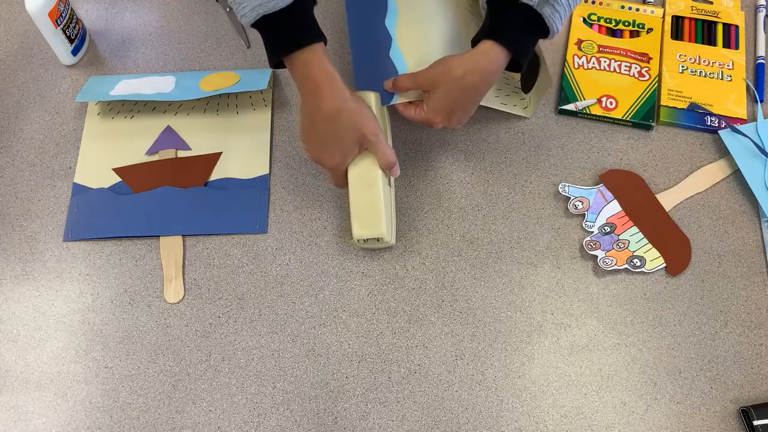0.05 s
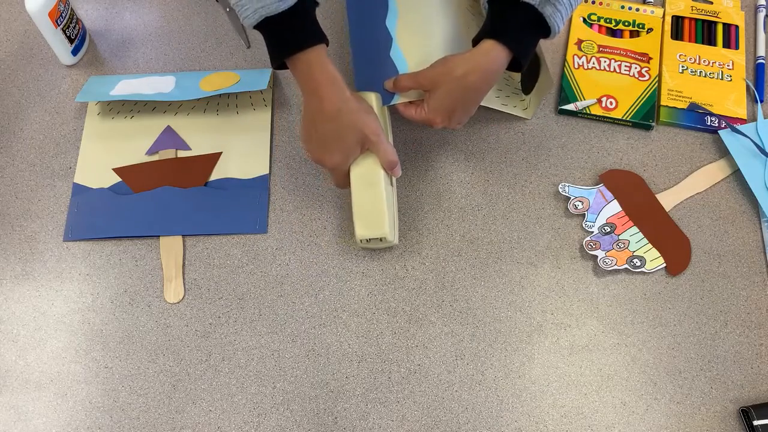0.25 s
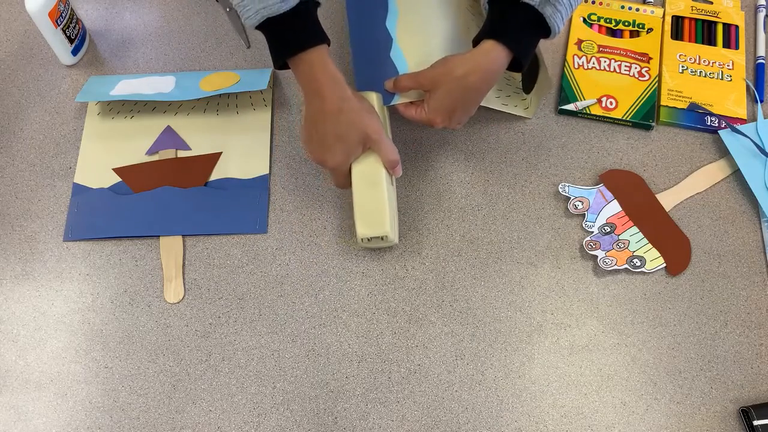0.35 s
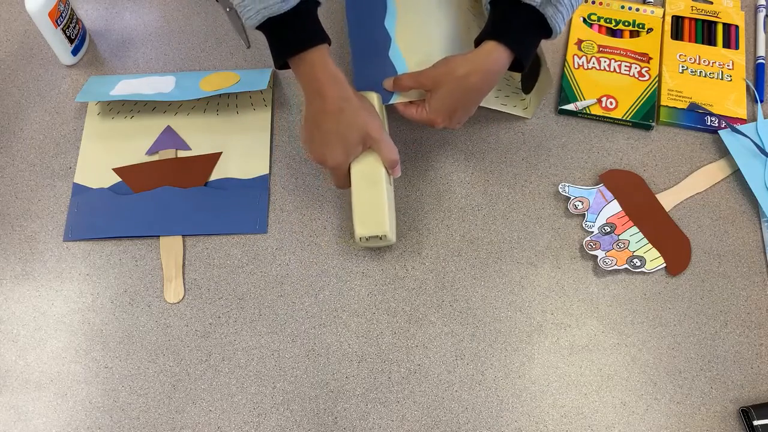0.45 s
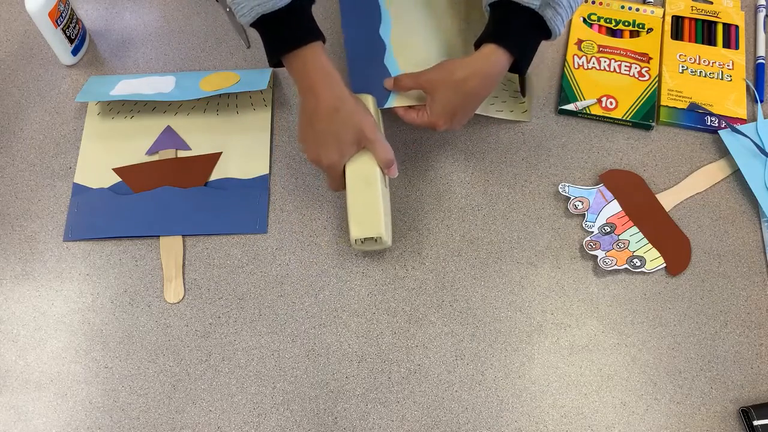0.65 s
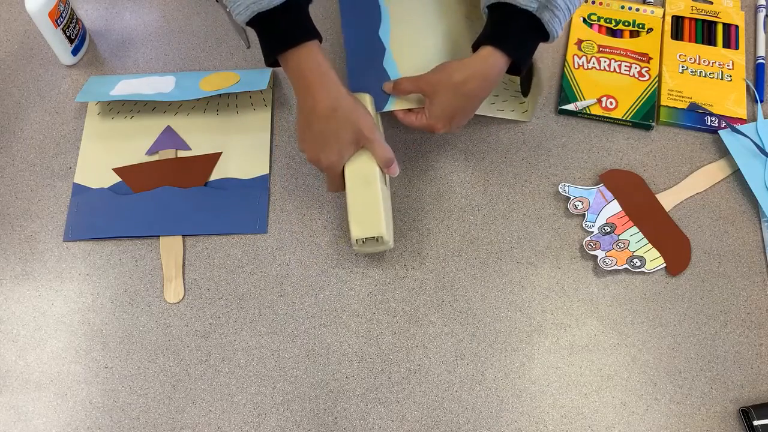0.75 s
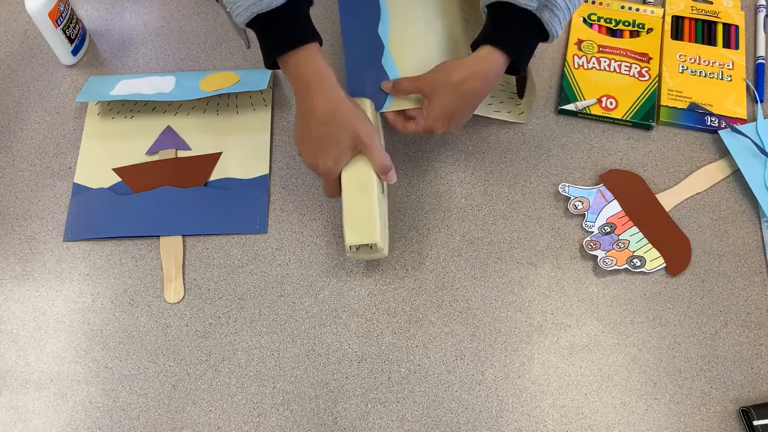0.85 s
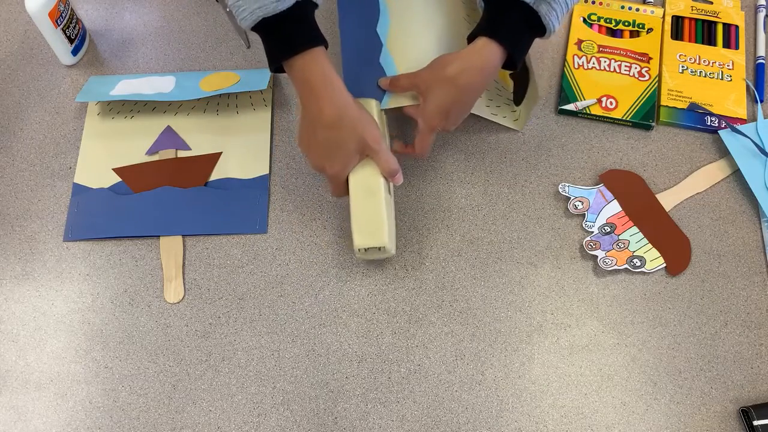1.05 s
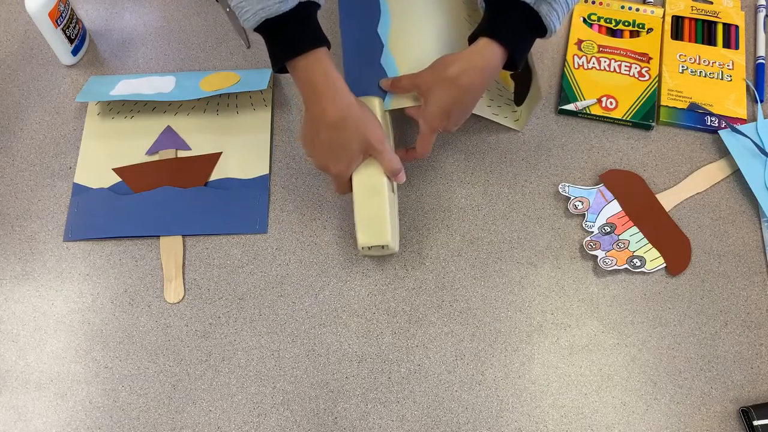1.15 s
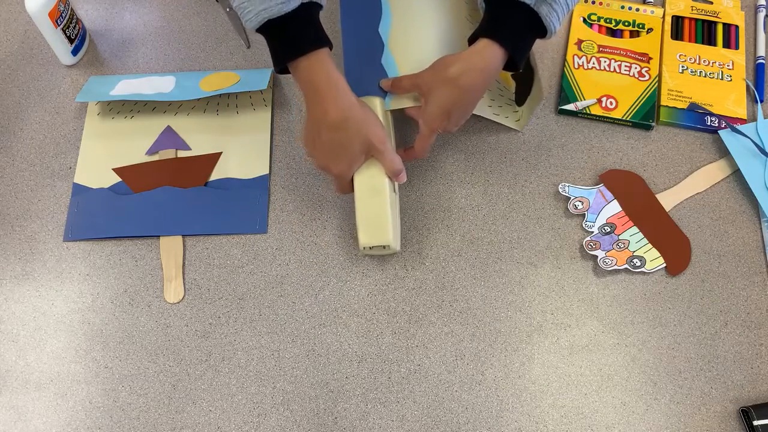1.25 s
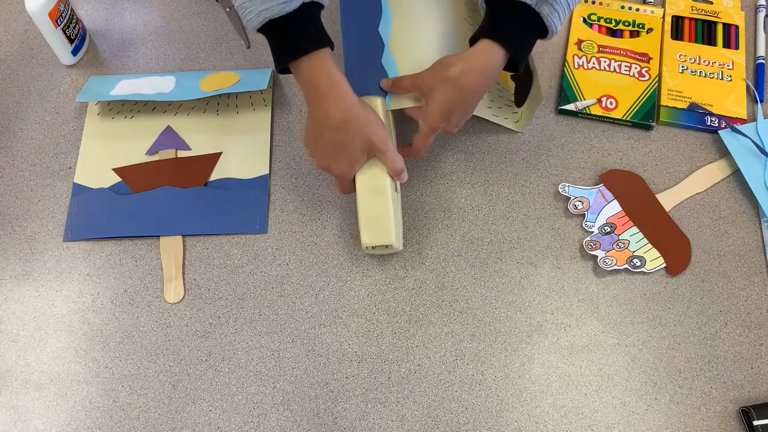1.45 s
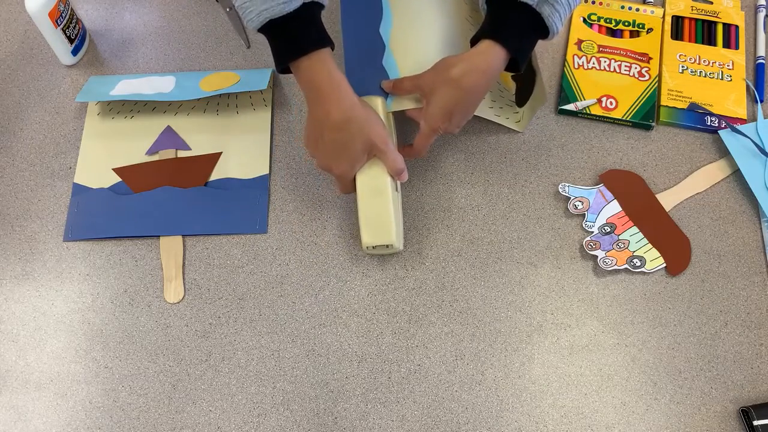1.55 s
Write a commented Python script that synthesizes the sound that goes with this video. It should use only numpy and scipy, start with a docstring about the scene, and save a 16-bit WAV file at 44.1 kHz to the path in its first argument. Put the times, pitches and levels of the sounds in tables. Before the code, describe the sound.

A desktop stapler is pressed once, close to the microphone. Faint plastic and steel ticks come at 0.1-0.2 s, then snap at 0.21, duller punch at 0.28 and loudest crunch at 0.35. A tick at 0.48 and faint rub from 0.54 lead to a bright spring clack at 0.63. Sparse ticks follow from 1.06 to 1.5, a soft low bump at 1.25. Short room echo, low ventilation rumble.

```python
"""Over a low ventilation rumble, faint ticks of the housing and rattling steel lead up to one stapler press.
The desktop stapler's staple snaps off its strip, punches through the sheets and is clinched on the anvil.
After a small tick the driver rubs in its channel, the arm catches lightly, then clacks back on its spring.
More ticks follow, with a soft bump of the hand through the table among them.
Blows are bursts of micro-impacts through coloured, ringing bodies; rub and air are filtered noise; a room answers."""
import sys
import numpy as np
from scipy import signal
from scipy.fft import rfft, irfft
from scipy.io import wavfile
from scipy.ndimage import uniform_filter1d

SR = 44100
rng = np.random.default_rng(int(sys.argv[2]) if len(sys.argv) > 2 else 0)


def file_out(sig):
    """Save sig as 16-bit WAV at sys.argv[1]."""
    # one column per channel
    cols = np.atleast_2d(sig).T
    # limit, then scale
    lim = np.clip(cols, -1, 1)
    pcm = np.round(lim * 32767).astype(np.int16)
    wavfile.write(sys.argv[1], SR, pcm)


N = 70560

# colour of each stage of the stroke, by name: (frequency [Hz], level [dB])
STAGE_COLOURS = { "snap": [(100, -25), (300, -20), (700, -15), (830, -2), (1290, 2), (1410, -12),
                 (1520, -5), (1700, -21), (1950, -9), (2400, -20), (2850, -13), (3250, -23), (3750, -14),
                 (5000, -12), (6400, -13), (6900, -20), (8500, -13), (10000, -18), (12500, -30),
                 (16000, -37)], "pierce": [(100, -21), (330, -25), (470, -10), (760, 1), (1000, -4),
                 (1220, -16), (1450, -4), (1660, -7), (1900, -30), (2600, -22), (3300, -41), (5700, -29),
                 (9000, -37), (15000, -65)], "clinch": [(80, -14), (220, -14), (350, -16), (500, -7),
                 (720, -7), (890, 2), (1050, -6), (1170, 1), (1400, -8), (1520, 0), (1700, -5), (1900, -9),
                 (2300, -22), (2700, -17), (4000, -21), (6300, -18), (7000, -25), (10000, -28),
                 (16000, -44)], "release": [(100, -21), (210, -22), (300, -3), (430, -2), (570, 3),
                 (850, -9), (1200, -4), (1700, -7), (2000, -6), (2300, -13), (2900, -7), (5000, -12),
                 (7500, -9), (10000, -14), (12000, -21), (16000, -24)], }


def amp(db):
    """Decibels to gain."""
    return 10 ** (np.asarray(db) / 20)


def unit(x):
    """Scales to an rms of one."""
    return x / np.sqrt(np.mean(x ** 2) + 1e-20)


def read(points, hz):
    """Reads a table on a log-frequency axis."""
    f, value = np.transpose(points)
    return np.interp(np.log(hz + 1), np.log(f + 1), value)


def add(mix, s, sound):
    """Mixes a sound in at a time in seconds, cut off at the end of the mix."""
    part = mix[round(s * SR):][:len(sound)]
    part += sound[:len(part)]


def body(colour, ring_db=None, size=4096):
    """Minimum-phase impulse response of a colour; with a ring level, steel resonances stand out of it."""
    # modes of the steel channel and spring:
    # (frequency [Hz], width [Hz], level over the broad clack before the ring level is added [dB])
    steel_modes = [(1700, 65, 15), (2650, 60, 3), (2857, 80, 8), (3735, 110, 9), (4000, 70, 4),
                   (4470, 70, 5), (4920, 90, 8), (5523, 70, 2), (6200, 80, 3), (6830, 100, 12),
                   (7560, 100, 6), (8260, 110, 5), (9600, 100, 5)]
    hz = np.fft.rfftfreq(size, 1 / SR)
    gain = amp(read(colour, hz))
    if ring_db is not None:
        ring_power = 0
        for f, width, db in steel_modes:
            ring_power = ring_power + amp(db + ring_db) ** 2 / (1 + (2 * (hz - f) / width) ** 2)
        gain = gain * np.sqrt(1 + ring_power)
    log_gain = np.log(np.r_[gain, gain[-2:0:-1]])
    # the Hilbert transform of the log gain gives the phase that puts the energy first
    return np.fft.ifft(np.exp(np.conj(signal.hilbert(log_gain)))).real


def crunch(rise, hold, t60, size=4096, count=12):
    """Force of a burst of micro-impacts (attack, hold, release): an even push in the bass, ragged treble."""
    ragged_above_hz = 2600
    t = np.arange(size) / SR
    attack = np.minimum((t + 1 / SR) / rise, 1)
    release = amp(-60 * np.maximum(t - rise - hold, 0) / t60)
    shape = attack * release
    even = ragged = shape * rng.standard_normal(size)
    # flatten the spectrum and restore the envelope in turn, for a fixed number of rounds
    for _ in range(count):
        z = rfft(even)
        even = irfft(z / (abs(z) + 1e-12))
        local_power = abs(uniform_filter1d(even ** 2, size=48))
        even = even * shape / np.sqrt(local_power + 1e-14)
    low = signal.butter(3, ragged_above_hz, "low", fs=SR)
    high = signal.butter(3, ragged_above_hz, "high", fs=SR)
    return signal.lfilter(*low, unit(even)) + signal.lfilter(*high, unit(ragged))


def strike(force, response, db):
    """A force through a body; the level is its whole energy expressed as an rms over five milliseconds."""
    x = signal.fftconvolve(force, response)
    return amp(db) * x * np.sqrt(.005 * SR / np.sum(x ** 2))


def brighten(x, db_per_octave):
    """Tilts the spectrum about 1 kHz, level beyond 250 Hz and 8 kHz."""
    tilt = [(hz, db_per_octave * np.log2(hz / 1000)) for hz in (250, 8000)]
    return signal.fftconvolve(x, body(tilt))


def noise(colour):
    """Steady noise of a given colour, at an rms of one."""
    gain = amp(read(colour, np.fft.rfftfreq(N, 1 / SR)))
    return unit(irfft(rfft(rng.standard_normal(N)) * gain, N))


def stapler():
    """Four blows make the stroke, heard directly and sent into the room; the hand soon damps each ring."""
    # the stroke by stage name: (time [s], level before hand damping [dB], rise [s], hold [s],
    # t60 of the force [s], steel ring [dB], free ringing [s], room send over level [dB],
    # room brightness [dB per octave])
    stages = { "snap": (0.2089, -7.8, .0004, .0028, .02, 1, .005, -21.5, -.2),
              "pierce": (0.2821, -13, .0003, .0003, .005, -22, .005, -21, 0),
              "clinch": (0.3527, -2, .0018, .0024, .017, -14, .008, -22.7, 1.1),
              "release": (0.6262, -8.7, .0008, .0055, .026, 3, .011, -22.5, .1), }
    hand_damping_t60_s = .018
    room_ring_db = -3  # the steel modes stand out less in the sound sent to all sides
    direct, sent = np.zeros((2, N))
    for name, (s, db, rise, hold, t60, ring_db, free, room_db, tilt_db) in stages.items():
        colour = STAGE_COLOURS[name]
        blow = strike(crunch(rise, hold, t60), body(colour, ring_db), db)
        damped_s = np.maximum(np.arange(len(blow)) / SR - free, 0)
        add(direct, s, blow * np.exp(-np.log(1000) * damped_s / hand_damping_t60_s))
        # the room receives a single click through the same body, at the end of the push
        spread = strike(np.ones(1), body(colour, ring_db + room_ring_db), db + room_db)
        add(sent, s + rise + hold, brighten(spread, tilt_db))
    return direct, sent


def slide():
    """The driver rubs in its channel as the hand lets up: friction noise that grows until it comes free."""
    # colour of the rub: (frequency [Hz], level [dB])
    rub_colour = [(200, -25), (600, -9), (1200, 0), (1600, -5), (2200, -22), (8000, -30), (16000, -50)]
    start_s, end_s = .54, .622
    end_db, growth_db = -41, 13
    progress = (np.arange(N) / SR - start_s) / (end_s - start_s)
    rubbing = (progress > 0) * (progress < 1)
    return noise(rub_colour) * rubbing * amp(end_db + growth_db * (np.clip(progress, 0, 1) - 1))


def handling():
    """Small impacts: light catches of the arm, and ticks that mix a plastic knock with a bright steel rattle."""
    # the arm catches lightly just before it springs back: (time [s], level [dB], t60 of the force [s])
    catches = [(0.6200, -39, .02), (0.6220, -26, .02), (0.6238, -21, .018)]
    # ticks of the stapler's housing and rattling steel: (time [s], knock level [dB], knock pitch [Hz],
    # rattle level [dB], rattle pitch [Hz], t60 of the force [s])
    ticks = [(0.0865, -45, 1000, -52, 5000, .012), (0.1070, -45, 1050, -47, 5200, .016),
             (0.1220, -52, 1700, -54, 4200, .025), (0.1770, -37, 1200, -65, 3800, .012),
             (0.4790, -32, 900, -40, 4400, .012), (0.5820, -54, 1200, -53, 4500, .02),
             (1.0605, -51, 1050, -84, 4500, .012), (1.1055, -60, 1400, -62, 3500, .015),
             (1.1115, -45, 1450, -49, 2900, .014), (1.1220, -52, 2000, -60, 4000, .025),
             (1.1725, -50, 1350, -63, 4000, .01), (1.2800, -68, 1400, -56, 3400, .009),
             (1.5150, -62, 1500, -68, 4000, .02)]
    # colour of the plastic knock: (multiple of the pitch [ratio], level [dB])
    knock_shape = [(.1, -20), (.4, -14), (.65, -2), (1, 0), (1.3, -3), (1.7, -17), (5, -40), (12, -60)]
    # colour of the bright rattle of the stapler: (multiple of the pitch [ratio], level [dB])
    rattle_shape = [(.05, -30), (.3, -14), (.55, -4), (1, 0), (1.5, -2), (2.1, -7), (2.7, -20), (4, -28)]
    rise_s, hold_s, tick_ring_db = .0005, .0008, -6
    out = np.zeros(N)
    for s, db, t60 in catches:
        add(out, s, strike(crunch(rise_s, hold_s, t60), body(STAGE_COLOURS["release"]), db))
    for s, knock_db, knock_hz, rattle_db, rattle_hz, t60 in ticks:
        layers = (knock_shape, knock_db, knock_hz), (rattle_shape, rattle_db, rattle_hz)
        for shape, db, hz in layers:
            colour = [(multiple * hz, level) for multiple, level in shape]
            add(out, s, strike(crunch(rise_s, hold_s, t60), body(colour, tick_ring_db), db))
    return out


def bump():
    """The hand lets go through the table: a couple of slow swings of the top under a smooth swell."""
    start_s, length_s, swing_hz, level_db = 1.252, .05, 42, -32
    out, t = np.zeros(N), np.arange(0, length_s, 1 / SR)
    swell = np.sin(np.pi * t / length_s) ** 2
    add(out, start_s, amp(level_db) * swell * np.sin(2 * np.pi * swing_hz * t))
    return out


def echoes(x):
    """First reflections from the table and nearby things: delayed copies, duller than the direct sound."""
    # separate reflections: (delay [s], gain before the colour [ratio])
    reflections = [(.0046, .09), (.0085, .04), (.0112, .1), (.0136, .07)]
    # colour of all reflections: (frequency [Hz], level [dB])
    echo_colour = [(100, -4), (900, 0), (1800, -2), (3500, -7), (16000, -11)]
    out = np.zeros(N)
    dull = signal.fftconvolve(x, body(echo_colour))[:N]
    for delay, gain in reflections:
        add(out, delay, gain * dull)
    return out


def room(x):
    """A diffuse noise tail that builds up quickly and dies at its own speed in each band."""
    # reverberation time: (frequency [Hz], t60 [s])
    room_t60 = [(150, .5), (400, .75), (900, .66), (1400, .66), (3700, .6), (7000, .54), (10000, .46),
                (16000, .36)]
    # colour of the tail: (frequency [Hz], level [dB])
    room_colour = [(100, 0), (220, 0), (310, 5), (450, -1), (750, -3), (1100, -1), (1350, -6), (1700, -3),
                   (2150, 2), (2800, -1), (3700, -3), (5000, 0), (7000, -3), (10000, -1), (16000, 1)]
    delay_s, build_s = .004, .018
    hz, t, z = signal.stft(rng.standard_normal(N), SR, nperseg=256)
    decay_db = -60 * t / read(room_t60, hz)[:, None]
    tail = signal.istft(z * amp(decay_db), SR)[1][:N]
    tail = tail * np.clip((np.arange(N) / SR - delay_s) / build_s, 0, 1)
    tail = signal.fftconvolve(tail / np.linalg.norm(tail), body(room_colour))[:N]
    return signal.fftconvolve(x, tail)[:N]


def ventilation():
    """Steady air: filtered noise gives low rumble and faint hiss, a sine gives the mains hum."""
    # colour of the air: (frequency [Hz], level [dB])
    air_colour = [(10, 0), (25, 0), (50, -7), (80, -15), (125, -15), (200, -24), (400, -31), (800, -38),
                  (1500, -43), (2200, -53), (5000, -56), (10000, -61), (16000, -64)]
    air_db, hum_hz, hum_db = -42, 121, -62  # air as rms, hum as peak
    hum = np.sin(2 * np.pi * hum_hz * np.arange(N) / SR)
    return amp(air_db) * noise(air_colour) + amp(hum_db) * hum


def scene(small_room_db=-15):
    """Stapler in the room; small sounds share one room send, relatively more than the blows get."""
    direct, sent = stapler()
    small = handling() + slide()
    near = direct + small
    reverb = room(sent + amp(small_room_db) * small)
    return (near + echoes(near) + reverb + bump() + ventilation())[None]


def record(dry):
    """The loudest peaks overload the microphone and round off below a ceiling; then the band limit."""
    ceiling, edge_hz = .92, 16100
    held = dry / (1 + (abs(dry) / ceiling) ** 8) ** (1 / 8)
    lowpass = signal.firwin(511, edge_hz, window=("kaiser", 9), fs=SR)
    return signal.oaconvolve(held, lowpass[None], "same")


dry = scene()
out = record(dry)
file_out(out)
```